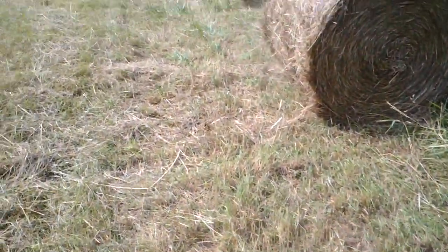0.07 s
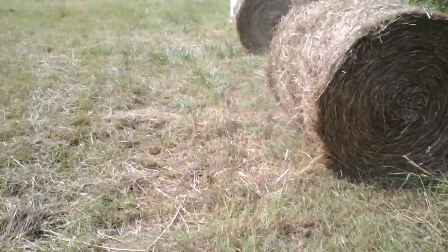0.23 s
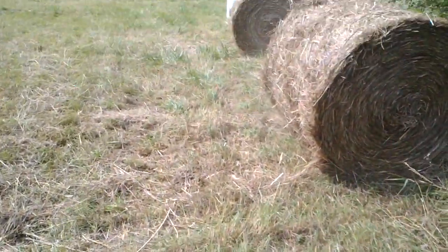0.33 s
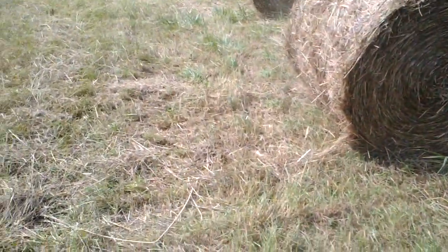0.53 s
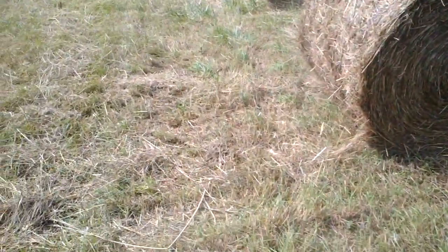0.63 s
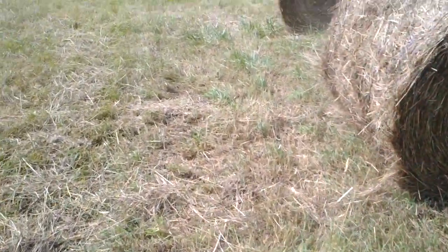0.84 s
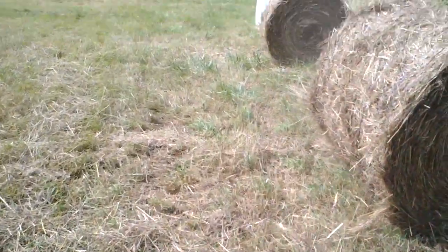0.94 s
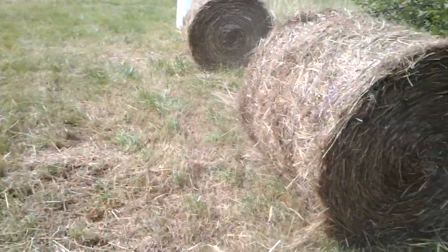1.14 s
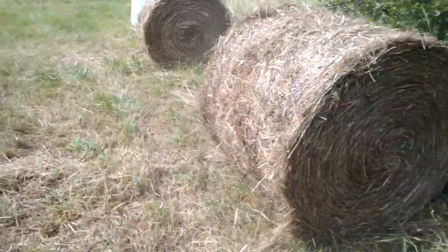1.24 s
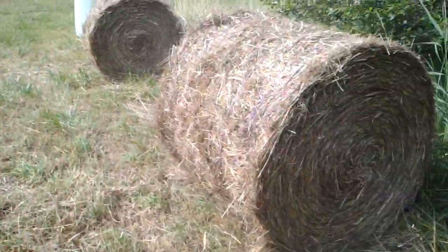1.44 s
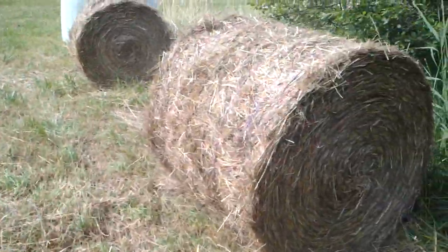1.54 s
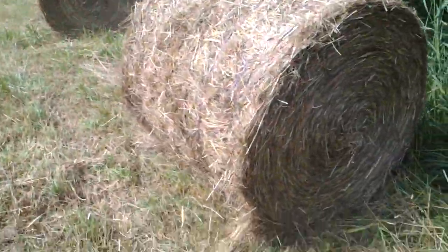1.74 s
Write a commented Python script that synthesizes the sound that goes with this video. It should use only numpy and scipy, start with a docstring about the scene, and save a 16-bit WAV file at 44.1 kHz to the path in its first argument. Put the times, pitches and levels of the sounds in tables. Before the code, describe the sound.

A diesel tractor idles in an open field, its clatter easing after about 1.2 seconds. At 0.25 and 0.55 seconds its sheet-steel implement bangs loudly, each bang a cluster of ringing, rattling impacts that briefly overloads the microphone. Dry stubble rustles softly nearby around 0.9 and 1.5 seconds, and a steel link clinks at 1.6. A light breeze rumbles on the microphone throughout.

```python
"""A hay field, where a diesel tractor idles: its periodic firing sounds the exhaust and excites the block
and loose covers. Its sheet-steel implement bangs twice, each bang a cluster of impacts that set panels,
frame and loose parts in free vibration, loud enough to overload the microphone. Later, dry stubble
rustles close by and a steel link clinks. A light breeze rumbles on the microphone throughout."""
import sys
import numpy as np
from scipy import signal
from scipy.fft import rfft, irfft
from scipy.io import wavfile
from scipy.ndimage import uniform_filter1d

SR = 44100
rng = np.random.default_rng(int(sys.argv[2]) if len(sys.argv) > 2 else 0)


def inscribe(sig):
    """Save sig as 16-bit PCM at rate SR to the path in sys.argv[1].

    A 1-D sig is mono; a 2-D sig holds one channel per row.
    Samples are clipped to [-1, 1] before scaling.
    """
    pcm = np.round(np.clip(np.atleast_2d(sig).T, -1, 1) * 32767)
    wavfile.write(sys.argv[1], SR, pcm.astype(np.int16))


N = 79380


def undb(db):
    """Decibels to amplitude ratio."""
    return 10 ** (np.asarray(db) / 20)


def unit(x):
    """Normalisation to an rms of 1."""
    return x / np.sqrt(np.mean(x ** 2))


def curve(rows, axis=1):
    """Linear interpolation of one column of a table over time."""
    rows = np.array(rows)
    return np.interp(np.arange(N) / SR, rows[:, 0], rows[:, axis])


def at_hz(hz, rows, axis=1):
    """Interpolation of one column of a table over log frequency."""
    rows = np.array(rows)
    return np.interp(np.log(hz + 1), np.log(rows[:, 0]), rows[:, axis])


def colour(x, rows):
    """Spectral shaping to an rms of 1, falling 12 dB an octave below the first row."""
    hz = np.fft.rfftfreq(N, 1 / SR)
    low_cut = np.minimum(hz / rows[0][0], 1) ** 2
    return unit(irfft(rfft(x) * undb(at_hz(hz, rows)) * low_cut, N))


def walk(rate_hz):
    """Smooth random modulation with an rms of 1."""
    k = max(int(SR / rate_hz), 2)
    steps = np.repeat(rng.standard_normal(N // k + 1), k)
    return unit(uniform_filter1d(steps, k)[:N])


def decay(t, t60):
    """Damping: amplitude falls exponentially, 60 dB in t60 seconds."""
    return np.exp(-np.log(1000) * t / t60)


def swell(rise_s, hold_s, t60):
    """Envelope of linear rise, hold and exponential decay."""
    t = np.arange(N) / SR
    return np.minimum(t / rise_s, 1) * decay(np.maximum(t - rise_s - hold_s, 0), t60)


def add(out, start, x):
    """Superposition of a sound from a start time in seconds."""
    i = int(start * SR)
    out[i:] += x[:N - i]


def ring(modes, attack_s):
    """Free vibration: a sum of damped modes, slightly detuned at each blow."""
    t, out = np.arange(N) / SR, np.zeros(N)
    for (hz, db, t60), detune in zip(modes, 0.0026 * rng.standard_normal(len(modes))):
        out += undb(db) * np.sin(2 * np.pi * hz * (1 + detune) * t) * decay(t, t60)
    return out * (1 - np.exp(-t / attack_s))


def dense_ring(rows, attack_s):
    """Modal overlap: crowded modes merge into noise, each octave band with its own decay."""
    t, hz = np.arange(N) / SR, np.fft.rfftfreq(N, 1 / SR)
    spectrum = rfft(colour(rng.standard_normal(N), rows))
    out = np.zeros(N)
    for centre in 32 * 2. ** np.arange(10):
        band = np.maximum(1 - np.abs(np.log2((hz + 1) / centre)), 0)
        out += irfft(spectrum * band, N) * decay(t, at_hz(centre, rows, axis=2))
    return out * (1 - np.exp(-t / attack_s))


def tractor():
    """Periodic excitation: one firing cycle drives the clatter, block, exhaust and covers."""
    # Each row: time in seconds, firing rate in Hz.
    firing = [(0.0, 55.84), (0.3, 57.47), (0.376, 60.16), (0.862, 56.55), (1.392, 58.02), (1.548, 56.6),
              (1.8, 57.27)]
    cycles = np.cumsum(curve(firing) * (1 + 0.004 * walk(25))) / SR
    bursts = np.exp(-(cycles % 1)) * undb(2.1 * walk(59.95))
    drive = 0.75 + bursts  # a steady floor remains between firings
    return clatter(drive) + block(drive) + exhaust(cycles) + covers(cycles)


def clatter(drive):
    """Amplitude modulation: broadband diesel noise pulses at each firing."""
    # Each row: frequency in Hz, relative spectral density in dB.
    spectrum = [(200, 7.5), (330, 0.5), (550, 1.5), (850, -5), (1280, -2), (1600, -2), (2000, -3.5),
                (2400, -10), (2900, -7), (3900, -10), (5500, -16), (8000, -22.5), (9700, -32.5),
                (11500, -53), (16000, -88)]
    # Each row: time in seconds, level in dB, treble gain in dB.
    levels = [(0, -31, 2.5), (.2, -30.5, 4.5), (.7, -26, -1), (1.05, -31, -2), (1.2, -34.5, 0),
              (1.35, -34.5, -5), (1.55, -37.5, -1), (1.8, -39, 6)]
    noise = colour(drive * rng.standard_normal(N), spectrum)
    body = signal.sosfiltfilt(signal.butter(1, 2480, fs=SR, output="sos"), noise)
    treble = (noise - body) * undb(curve(levels, axis=2))
    return (body + treble) * undb(curve(levels))


def block(drive):
    """Resonance: the engine block answers the firings in one narrow band."""
    # Each row: frequency in Hz, relative spectral density in dB.
    response = [(1000, -48), (1170, -5.5), (1285, 4), (1390, -9), (1550, -20), (4000, -100)]
    return undb(-46.5) * colour(drive * rng.standard_normal(N), response)


def exhaust(cycles):
    """Line spectrum: partials follow the firing rate, their phases smeared by the silencer."""
    # Each row: multiple of the firing rate, level in dB.
    overtones = [(1.5, -40.5), (2, -34.5), (3, -38.5), (4, -54.5), (5, -50), (6, -54.5)]
    # Each row: time in seconds, level of the lowest partial in dB.
    lowest_db = [(0, -31.5), (.2, -25.5), (.75, -27.5), (1.1, -25), (1.35, -33), (1.8, -31.5)]
    flutter_db, smear_rad = 0.6, 0.17
    out = np.zeros(N)
    for multiple, db in [(0.97, curve(lowest_db))] + overtones:
        amplitude = np.sqrt(2) * undb(db + flutter_db * walk(8.54))
        phase = 2 * np.pi * (multiple * cycles + rng.random()) + smear_rad * walk(7.05)
        out += amplitude * np.cos(phase)
    return out


def covers(cycles):
    """Forced vibration: each firing shakes the loose covers into uneven taps that ring their resonances."""
    # Each row: resonance in Hz, bandwidth in Hz, relative level in dB.
    resonances = [(1302, 46, 1.5), (1725, 140, 3), (2020, 160, 0.5), (2700, 140, -4.5), (3760, 120, -8)]
    # Each row: time in seconds, level in dB.
    levels = [(0, -42.5), (.25, -36), (.8, -38.5), (1.03, -36), (1.14, -38.5), (1.3, -46.5), (1.4, -54),
              (1.8, -54)]
    decay_cycles, grain_db, flutter_db = .8, 3, 2
    shake = np.exp(-(cycles % 1) / decay_cycles) * undb(grain_db * walk(700) + flutter_db * walk(30.58))
    taps = shake * rng.standard_normal(N)
    rattle = np.zeros(N)
    for hz, width, db in resonances:
        resonator = signal.iirpeak(hz, hz / width, fs=SR)
        rattle += undb(db) * unit(signal.lfilter(*resonator, taps))
    band = signal.butter(2, [1000, 5000], "bandpass", fs=SR, output="sos")
    return unit(signal.sosfilt(band, rattle)) * undb(curve(levels))


def breeze():
    """Turbulence: light gusts make a low, fluctuating pressure on the microphone."""
    # Each row: frequency in Hz, relative spectral density in dB.
    spectrum = [(33, 6), (42, -8), (70, 7), (105, 8), (190, -2), (300, -10.5), (600, -43), (2000, -89)]
    gust_db = -36.5 - 2.5 * walk(7.1)
    return undb(gust_db) * colour(rng.standard_normal(N), spectrum)


def implement():
    """Impact excitation: steel cracks on steel, and the sheets ring, rumble and rattle."""
    # Each row: start in seconds, panel, rumble, crash and crack levels in dB,
    # most excited frequency in Hz, attack in seconds.
    blows = [(0.2424, -11, -16, -19.5, -38, 358, 0.0031), (.281, -14, -13, -24, -17.5, 170, 0.00084),
             (.289, -23, -18.5, -17.5, -17.5, 240, 0.0049), (.306, -21, -23, -25, -20, 315, 0.00089),
             (.355, -20, -16, -28.5, -50, 198, 0.011), (0.5426, -12, -9, -30, -12.5, 245, 0.0029),
             (.552, -7, -13.5, -15, -8, 314, 0.00072), (.597, -17.5, -23.5, -39, -46, 218, 0.0021),
             (.712, -18.5, -19.5, -31.5, -48, 292, 0.0027), (.744, -25.5, -33.5, -28, -24, 366, 0.00042)]
    # Each row of both: frequency in Hz, relative spectral density in dB, t60 in seconds.
    rumble_bands = [(44.5, -9, 0.97), (71, 4.5, 0.85), (128, -4, 1), (225, 2.5, 0.85), (392, 0, 0.72),
                    (553, -8, 0.97), (890, -19, 0.92), (1580, -18.5, 0.58), (3000, -51, 0.39),
                    (8000, -76, 0.61), (12000, -80, .5)]
    crash_bands = [(413, 6.5, 0.075), (980, 4.5, 0.58), (1950, 0.5, 0.43), (3200, -0.5, 0.13),
                   (4700, -2.5, 0.42), (5700, -2, 0.21), (8400, -10.5, 0.36), (9860, -13, 0.21),
                   (12300, -55, 0.47), (16000, -49, 0.28)]
    # Each row: frequency in Hz, relative spectral density in dB.
    crack_spectrum = [(700, 7), (2000, 3.5), (4000, 1.5), (6300, -0.5), (8500, -4.5), (10500, -9.5),
                      (12500, -33), (16000, -40)]
    out = np.zeros(N)
    for start, panel_db, rumble_db, crash_db, crack_db, centre_hz, attack_s in blows:
        boom = undb(panel_db) * (panel(centre_hz, attack_s) + hollow_knock(centre_hz, attack_s))
        rumble = undb(rumble_db) * dense_ring(rumble_bands, attack_s + 0.0011)
        rattle_db = 2 * walk(495)
        crash = undb(crash_db + rattle_db) * dense_ring(crash_bands, attack_s)
        contact = colour(rng.standard_normal(N), crack_spectrum)
        crack = undb(crack_db) * contact * swell(attack_s, 0, t60=0.054)
        add(out, start, boom + rumble + crash + crack)
    return out


def panel(centre_hz, attack_s):
    """Selective excitation: a blow favours the panel modes near one frequency."""
    # Each row: frequency in Hz, level in dB, t60 in seconds.
    modes = [(145.55, 1, 0.93), (179.5, -6, 1), (195, 1.5, 0.43), (220, -3.5, 0.47), (310.2, 0, 0.3),
             (320.5, -9, 1), (346.8, -8.5, 0.51), (378, -3.5, 0.42), (386.6, 1, 0.25), (459, -20, 1),
             (569, -7, 0.15), (654, -15, 1.0), (903, -10.5, 0.37), (1228, -23, 0.53)]
    width_octaves, distant_db = 0.38, -7
    excited = []
    for hz, db, t60 in modes:
        nearness = np.exp(-.5 * (np.log2(hz / centre_hz) / width_octaves) ** 2)
        excited.append((hz, db + distant_db * (1 - nearness), t60))
    return ring(excited, attack_s)


def hollow_knock(centre_hz, attack_s):
    """Heavy damping: close modes around one pitch blur into a short band of noise."""
    step_octaves = 0.075
    # Each row: steps from the centre, relative spectral density in dB.
    shape = [(-6, -50), (-1, -3), (0, 0), (1, -3), (4, -30), (12, -90)]
    band = [(centre_hz * 2 ** (k * step_octaves), db) for k, db in shape]
    return undb(0.5) * colour(rng.standard_normal(N), band) * swell(2 * attack_s, 0, t60=0.11)


def clacks():
    """Local resonance: each struck spot rings briefly in a main mode and two weaker neighbours."""
    # Each row: start in seconds, frequency in Hz, level in dB, t60 in seconds.
    spots = [(0.2434, 1362, -13.5, 0.082), (.2455, 384, -6.5, 0.12), (.260, 1670, -16.5, 0.064),
             (.296, 3350, -20, 0.13), (.5435, 861, -10.5, 0.15), (.551, 815, -4, 0.075),
             (.556, 1224, -17, .12), (.595, 1130, -18, 0.085), (.613, 1016, -17, 0.054),
             (.734, 371, -14.5, 0.12), (.769, 371, -14, 0.14)]
    spacing, neighbour_db = 0.091, -11.5
    out = np.zeros(N)
    for start, hz, db, t60 in spots:
        modes = [(hz * (1 + k * spacing), db + abs(k) * neighbour_db, t60) for k in (-1, 0, 1)]
        add(out, start, ring(modes, attack_s=0.0022))
    return out


def frame():
    """Inertia: the heavy frame takes up the blows slowly and shudders at low frequency."""
    # Each row: start in seconds, frequency in Hz, level in dB, then rise, hold and t60 in seconds.
    shudders = [(0.249, 66, -6, 0.032, 0.0078, 0.081), (0.302, 81.5, -9.5, 0.0094, 0.04, 1),
                (0.566, 71, -10.5, 0.02, 0.026, 0.13), (0.686, 58.6, -15, 0.043, 0.0096, 0.32)]
    t, out = np.arange(N) / SR, np.zeros(N)
    for start, hz, db, rise_s, hold_s, t60 in shudders:
        add(out, start, undb(db) * swell(rise_s, hold_s, t60) * np.sin(2 * np.pi * hz * t))
    return out


def pings():
    """Frequency modulation: loose steel parts squeak and ping in short, unsteady high tones."""
    # Each row: start in seconds, frequency in Hz, level in dB, then rise and t60 in seconds.
    tones = [(.281, 7900, -15.5, 0.00057, 0.021), (0.292, 4360, -24, 0.0047, 0.21),
             (0.32, 4330, -22, 0.012, 0.07), (0.466, 5570, -37, 0.011, 0.31),
             (0.549, 5830, -17.5, 0.0029, 0.057), (0.723, 5330, -23.5, 0.0062, 0.058),
             (.743, 6530, -26, 0.0033, 0.033), (1.331, 5583, -36.5, 0.014, 0.11)]
    out = np.zeros(N)
    for start, hz, db, rise_s, t60 in tones:
        cycles = np.cumsum(hz * (1 + 0.013 * walk(730))) / SR
        add(out, start, undb(db) * swell(rise_s, 0, t60) * np.sin(2 * np.pi * cycles))
    return out


def stubble():
    """Incoherent summation: the crackles of dry stalks merge into soft swells of grainy noise."""
    # Each row: peak time in seconds, Gaussian width in seconds, level in dB.
    rustles = [(0.859, 0.064, -36.5), (1.026, 0.062, -66), (1.344, 0.064, -51.5), (1.552, 0.077, -40.5),
               (1.68, 0.13, -50.5), (1.79, 0.024, -54)]
    # Each row: frequency in Hz, relative spectral density in dB.
    spectrum = [(1200, -10), (3000, -0.5), (5500, 4), (7500, 0), (10000, -8), (12500, -34), (16000, -55)]
    t, grain_db = np.arange(N) / SR, 2
    envelope = sum(undb(db) * np.exp(-.5 * ((t - peak) / width) ** 2) for peak, width, db in rustles)
    crackle = rng.standard_normal(N) * undb(grain_db * walk(900))
    return envelope * colour(crackle, spectrum)


def link():
    """Impact and rebound: a steel link touches twice, each time with a tick, a ring and a knock."""
    # Each row: start in seconds, then ring, knock and tick levels in dB.
    contacts = [(1.5772, -44, -26, -23.5), (1.5825, -30.5, -35, -33)]
    # Each row of both: frequency in Hz, level in dB, t60 in seconds.
    tick_modes = [(2710, -6, .035), (4820, -5, .04), (6300, 0.5, 0.042), (6570, -4, 0.033),
                  (7000, -16, .06)]
    link_modes = [(788, -8, .26), (1364, 4.5, 0.19), (2060, -8, 0.45), (3140, -4.5, 0.28),
                  (4215, -9.5, 0.52), (4296, -12, 0.25), (5308, -10, .17), (5582, -4, 0.17)]
    # Each row: frequency in Hz, relative spectral density in dB, t60 in seconds.
    knock_bands = [(151, -7, 0.78), (473, 3.5, 0.21), (1010, -8, 0.26), (1600, -4.5, 0.17),
                   (2980, -11.5, 0.091), (6400, -20, 0.075), (8500, -20, 0.087), (12000, -55, .08)]
    out, attack_s = np.zeros(N), 0.00041
    for start, ring_db, knock_db, tick_db in contacts:
        tick = undb(tick_db) * ring(tick_modes, attack_s=.0001)
        ringing = undb(ring_db) * ring(link_modes, attack_s)
        knock = undb(knock_db) * dense_ring(knock_bands, attack_s)
        add(out, start, tick + ringing + knock)
    return out


def scene():
    """Superposition: all sources add at one microphone in the open air."""
    return (tractor() + implement() + clacks() + frame() + pings() + link() + stubble() + breeze())[None]


def record(dry):
    """Saturation: the microphone flattens the loudest peaks; a low-pass filter then limits the treble."""
    ceiling, knee, top_hz = .72, 6, 15900
    clipped = dry / (1 + np.abs(dry / ceiling) ** knee) ** (1 / knee)
    return signal.sosfilt(signal.ellip(8, .2, 70, top_hz, fs=SR, output="sos"), clipped)


dry = scene()
out = record(dry)
inscribe(out)
```